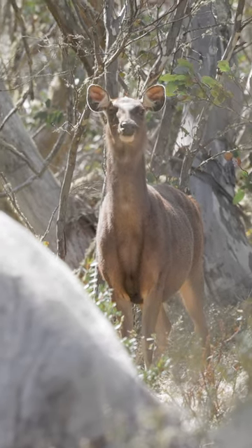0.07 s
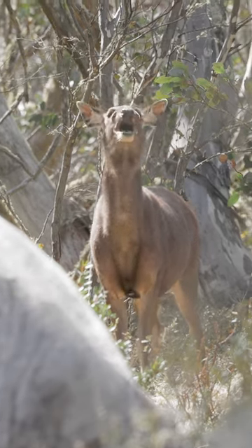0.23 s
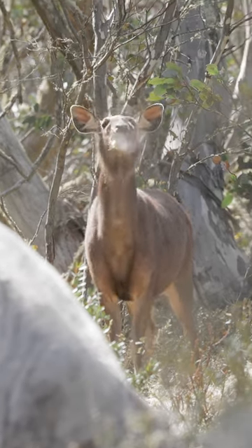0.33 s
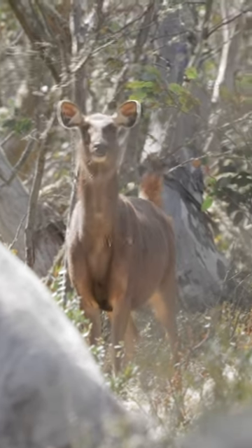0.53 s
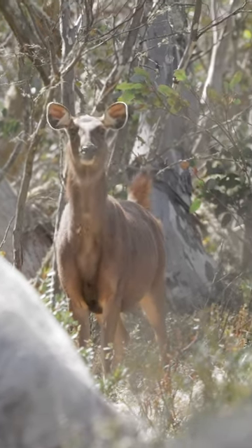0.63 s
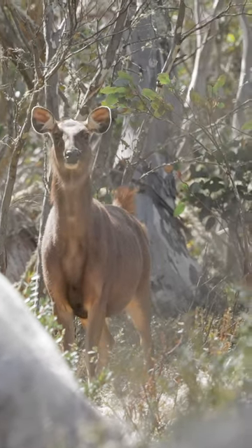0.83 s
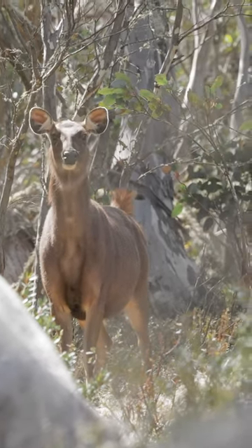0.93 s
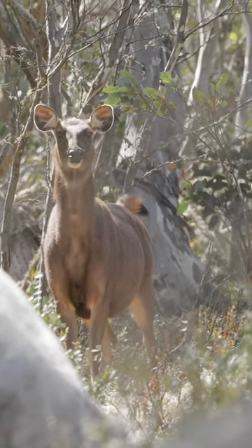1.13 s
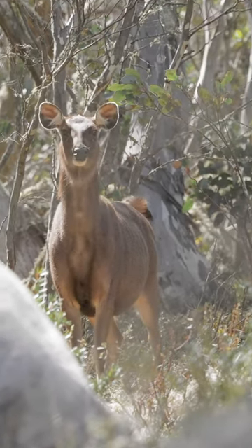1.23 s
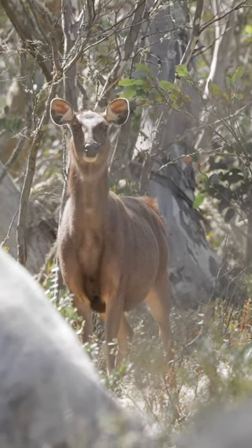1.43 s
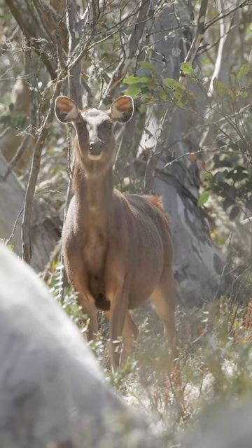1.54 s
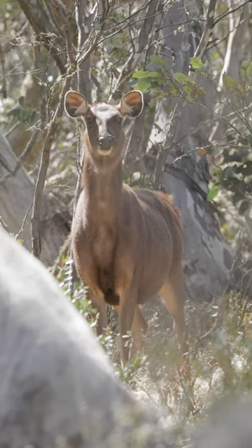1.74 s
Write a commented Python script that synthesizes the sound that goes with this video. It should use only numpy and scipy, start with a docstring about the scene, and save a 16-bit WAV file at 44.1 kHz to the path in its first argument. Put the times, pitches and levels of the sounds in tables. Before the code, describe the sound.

A deer gives one loud, bright alarm honk, slightly distorted on the microphone, that turns darker and rough at its end. The call echoes through the woodland and fades over about a second, leaving quiet air and faint insects.

```python
"""A deer's alarm honk in woodland

One loud, bright, hard note scoops up, holds, then darkens, sags and turns rough as the mouth closes.
The vocal folds supply harmonics and the throat's resonances shape them. Trunks and a slope reflect the
call, and scattering among the trees rings for a second over quiet air, faint insects and a twig's tick.
The call overloads the recorder, which clips it flat."""
import sys
import numpy as np
from scipy import signal
from scipy.fft import rfft, irfft, next_fast_len
from scipy.io import wavfile
from scipy.ndimage import map_coordinates

SR = 44100
rng = np.random.default_rng(int(sys.argv[2]) if len(sys.argv) > 2 else 0)


def dump_mix(stems):
    """Bounce the given channels to the path in sys.argv[1] as a 16-bit WAV at rate SR."""
    frames = np.atleast_2d(stems).T  # one column per channel
    limited = np.clip(frames, -1, 1)  # hard clip at full scale
    pcm = np.round(limited * 32767).astype(np.int16)
    wavfile.write(sys.argv[1], SR, pcm)


N = 79380


def amp(db):
    """Amplitude ratio of a level in decibels."""
    return 10 ** (np.asarray(db) / 20)


def unit(x):
    """Normalisation to an rms of 1."""
    return x / np.sqrt(np.mean(x ** 2) + 1e-20)


def along(points, hz):
    """Interpolation of (frequency, value) points on a logarithmic frequency axis."""
    knots_hz, values = np.transpose(points)
    return np.interp(np.log(hz + 1), np.log(knots_hz + 1), values)


def curves(rows, t):
    """Linear interpolation of each column after the first at the times t."""
    times, *columns = np.transpose(rows)
    return [np.interp(t, times, column) for column in columns]


def wobble(rate):
    """Smooth random modulation: a spline through rate knots a second."""
    return map_coordinates(rng.standard_normal(N // 8), [np.arange(N) * rate / SR], mode="wrap")


def peak(hz, centre_hz, width_hz):
    """Lorentzian resonance curve, width_hz wide at half amplitude."""
    return 1 / (1 + ((hz - centre_hz) / (width_hz / 2)) ** 2)


def filtered(x, response):
    """Linear filtering: the spectrum of x times a complex frequency response."""
    size = next_fast_len(N + SR // 2)
    return irfft(rfft(x, size) * response(np.fft.rfftfreq(size, 1 / SR)), size)[..., :N]


def coloured(x, db_of_hz, size=512):
    """Zero-phase filtering by a short, windowed impulse response."""
    gain = amp(db_of_hz(np.fft.rfftfreq(size, 1 / SR)))
    taps = np.fft.fftshift(irfft(gain), axes=-1) * signal.get_window("hann", size)
    return signal.fftconvolve(np.atleast_2d(x), np.atleast_2d(taps), axes=1)[:, size // 2:][:, :N]


def panned(x, pan):
    """A frequency-dependent level difference between left and right."""
    return coloured(x, lambda hz: np.array([[.5], [-.5]]) * along(pan, hz))


def noise_pair(correlation):
    """Partly coherent white stereo noise: the mid-to-side ratio sets the correlation."""
    def weights(hz):
        angle = np.arccos(np.clip(along(correlation, hz), -1, 1)) / 2
        return np.array([np.cos(angle), np.sin(angle)])
    mid, side = filtered(rng.standard_normal((2, N)), weights)
    return np.array([mid + side, mid - side])


def noise_band(centre_hz, width_hz):
    """Incoherent stereo noise through one resonance, at an rms of 1."""
    return unit(filtered(rng.standard_normal((2, N)), lambda hz: peak(hz, centre_hz, width_hz)))


def air(t, flutter_db=0.39):
    """Quiet moving air: broadband noise whose level drifts slowly."""
    # spectrum of the air (frequency [Hz], relative spectral density [dB])
    spectrum = [(20, -18.5), (60, -12.5), (140, -15), (300, -5), (480, -12), (800, -10.5), (1500, -25.5),
                (3000, -22.5), (3900, -26.5), (11800, -35), (15500, -53.5)]
    # likeness of left and right (frequency [Hz], correlation [-1 to 1])
    correlation = [(60, 0.52), (240, -0.23), (950, 0.29), (3770, 0.18), (15000, -0.3)]
    # slow drift (time [s], level [dB])
    drift = [(0, -65.5), (.18, -59.5), (1.3, -66.5), (1.68, -67.5), (1.78, -64)]
    level_db, = curves(drift, t)
    noise = filtered(noise_pair(correlation), lambda hz: amp(along(spectrum, hz)))
    return amp(level_db + flutter_db * wobble(8.2)) * unit(noise)


def insects(t, level_db=-82, flutter_db=3):
    """Faint insects: narrow-band noise under random amplitude modulation."""
    return amp(level_db + flutter_db * wobble(13)) * noise_band(centre_hz=3230, width_hz=260)


def twig(t, onset_s=0.755, level_db=-54, t60_s=0.0895):
    """One small twig tick: a band of noise with a sudden onset and exponential decay."""
    envelope = (t > onset_s) * amp(level_db - 60 * (t - onset_s) / t60_s)
    return envelope * noise_band(centre_hz=3812, width_hz=900)


def forest(call, build_s=0.015, far_db=-27.5, far_stretch=1.759):
    """Reverberation by scattering: the treble dies first; distant trees ring weaker and longer."""
    # decay among the near trees (frequency [Hz], reverberation time T60 [s])
    t60 = [(150, 1.4), (370, 1.289), (1100, 1.0315), (2200, 0.751), (3000, 0.6463), (4500, 0.437),
           (8000, .33), (15000, 0.2)]
    # spectrum of the scatter (frequency [Hz], gain [dB])
    colour = [(150, -18), (370, -18.5), (750, -14.5), (1100, -8.5), (1480, -12.5), (1850, -9), (2300, -10),
              (4000, -8), (10000, -13.5)]
    # likeness of left and right (frequency [Hz], correlation [-1 to 1])
    correlation = [(300, 0.74), (650, 0.93), (1400, 0), (8000, 0)]
    # balance of the scatter (frequency [Hz], left minus right [dB])
    balance = [(370, -1), (1100, -1), (1850, -4.5), (2600, -0.5), (6000, 2.5)]
    hz, t, noise = signal.stft(noise_pair(correlation), SR, nperseg=256)
    decay_db = -60 * t / along(t60, hz)[:, None]
    near, far = amp(decay_db), amp(far_db + decay_db / far_stretch)
    envelope = np.hypot(near, far) * (1 - np.exp(-t / build_s))
    envelope /= np.sqrt(np.mean(envelope ** 2, axis=1, keepdims=True) * N)  # equal energy per band
    _, impulse_response = signal.istft(noise * envelope * amp(along(colour, hz))[:, None], SR, nperseg=256)
    return panned(signal.fftconvolve(call[None], impulse_response, axes=1)[:, :N], balance)


def slope(call, cutoff_hz=537.83):
    """Reflection from the slope behind: dull, closely spaced echoes prolong the fundamental."""
    # paths by way of the slope (delay [s], gain [dB])
    paths = [(0.0804, -11.5), (.127, -12.5), (.173, -15.5), (0.2194, -20), (0.2712, -22.5)]
    low = signal.sosfilt(signal.butter(4, cutoff_hz, fs=SR, output="sos"), call)
    return filtered(low, lambda hz: sum(amp(db) * np.exp(-2j * np.pi * hz * delay) for delay, db in paths))


def echoes(call):
    """Discrete reflections: big trunks and the slope return delayed, dulled copies."""
    # reflected paths (delay [s], left gain [dB], right gain [dB])
    paths = [(.021, -10, -13), (.046, -14.5, -10.5), (.083, -15.5, -18.5), (.127, -19, -24),
             (0.199, -27.5, -29.5)]
    # spectrum of a reflection (frequency [Hz], gain [dB])
    colour = [(370, -3.5), (750, -4), (1200, -2), (1850, -2.5), (2600, -3), (4000, -9.5), (10000, -19.5)]
    def response(hz):
        return sum(amp([[left], [right]]) * np.exp(-2j * np.pi * hz * round(delay * SR) / SR)
                   for delay, left, right in paths)
    dull = coloured(call, lambda hz: along(colour, hz))
    return filtered(dull, response)


def direct(call, right_lag_s=0.000096):
    """Direct sound: it reaches the two microphones with differences of level and arrival time."""
    # balance of the straight path (frequency [Hz], left minus right [dB])
    balance = [(370, 7.5), (750, 12.5), (1100, 0.5), (1480, -13.5), (1850, -3), (2220, 3.5), (2600, -7.5),
               (3000, 2), (4000, 8)]
    delays = np.array([[-.5], [.5]]) * right_lag_s
    return filtered(panned(call, balance), lambda hz: np.exp(-2j * np.pi * hz * delays))


def throat(hz, t):
    """Gain of the vocal tract, whose resonances (formants) slide down as the mouth closes."""
    # closing of the mouth (time [s], closure [0 open, 1 closed])
    mouth = [(.22, 0.036), (.307, 0.0764), (.321, .39), (.344, .47), (.356, 0.73), (.38, 1)]
    # formants (centre open [Hz], centre closed [Hz], width [Hz], gain open [dB], gain closed [dB])
    formants = [(1100, 760, 150, -19, -17.5), (1480, 1000, 200, -20.5, -6.5), (2315.1, 1330, 160, 0.5, -6),
                (2538, 2120, 360, -1.5, -20.5), (3000, 2900, 250, -21, -22.5),
                (4033, 3600, 870, -20.5, -23.5), (7500, 5000, 760, -28.5, -42.5)]
    # floor between the formants (frequency [Hz], gain [dB])
    valley = [(300, -29.5), (750, -27.5), (3000, -27.5), (5000, -39.5), (10000, -42), (15000, -54)]
    closure, = curves(mouth, t)
    gain = amp(along(valley, hz))
    for open_hz, closed_hz, width_hz, open_db, closed_db in formants:
        centre_hz = open_hz + (closed_hz - open_hz) * closure
        formant_db = open_db + (closed_db - open_db) * closure
        gain = gain + amp(formant_db) * peak(hz, centre_hz, width_hz)
    return gain


def honk(t, harmonics=40, jitter=0.039, shimmer_db=0.5, rasp_db=-2, knots_per_s=170):
    """Source-filter voicing: vocal-fold harmonics and air pulsed once a cycle excite the throat."""
    # course of the call (time [s], pitch [Hz], gain [dB], roughness [0 to 1])
    contour = [(.217, 333, -47, 0.2), (.2215, 339.7, -7.5, 0.14), (.229, 353.1, -1, 0.33),
               (.246, 356.4, 5.5, .22), (.264, 370.7, 2, .1), (.315, 371.5, 6, .07), (.345, 368.5, 3, 0),
               (.359, 360.9, 0, 0.1), (.373, 339.2, -6, 0.5), (.393, 330.2, -13, 0.3),
               (.425, 321.5, -66, .5)]
    # chesty fundamental, swelling as the mouth closes (time [s], level relative to the call's gain [dB])
    chest = [(.22, -23.5), (.265, -9.5), (.308, -15), (.322, -11), (.36, -4.5), (.39, -16)]
    pitch_hz, gain_db, roughness = curves(contour, t)
    chest_db, = curves(chest, t)
    on = (t > contour[0][0]) & (t < contour[-1][0])
    # roughness scales the pitch jitter, the level shimmer and the rasp of air
    pitch_scatter = 1 + jitter * roughness * wobble(knots_per_s)
    phase = 2 * np.pi * np.cumsum(pitch_hz * pitch_scatter) / SR
    gain = amp(gain_db + shimmer_db * roughness * wobble(knots_per_s))
    voice = amp(chest_db) * np.sin(phase)
    for k in range(2, harmonics + 1):
        offset = np.pi * k * k / 4  # quadratic phase spreads each pulse over the cycle
        voice[on] += throat(k * pitch_hz[on], t[on]) * np.cos(k * phase[on] + offset)
    pulsed_air = rng.standard_normal(N) * (1 + np.cos(phase))
    hz, frame_times, spectra = signal.stft(pulsed_air, SR, nperseg=256)
    rasp = signal.istft(spectra * throat(hz[:, None], frame_times), SR, nperseg=256)[1][:N]
    return on * gain * (voice + amp(rasp_db) * roughness * unit(rasp))


def scene():
    """Superposition of the direct honk, its reflections and the woodland background."""
    t = np.arange(N) / SR
    call = honk(t)
    return direct(call) + echoes(call) + slope(call) + forest(call) + air(t) + insects(t) + twig(t)


def record(dry, ceiling=0.5046, hardness=7, low_cut_hz=25, top_hz=15600):
    """Saturation: the input stage clips the call flat; a low cut and a band limit follow."""
    clipped = dry / (1 + np.abs(dry / ceiling) ** hardness) ** (1 / hardness)
    low_cut = signal.butter(1, low_cut_hz, "high", fs=SR, output="sos")
    band_limit = signal.ellip(10, .1, 80, top_hz, fs=SR, output="sos")
    return signal.sosfilt(band_limit, signal.sosfilt(low_cut, clipped))


dry = scene()
out = record(dry)
dump_mix(out)
```